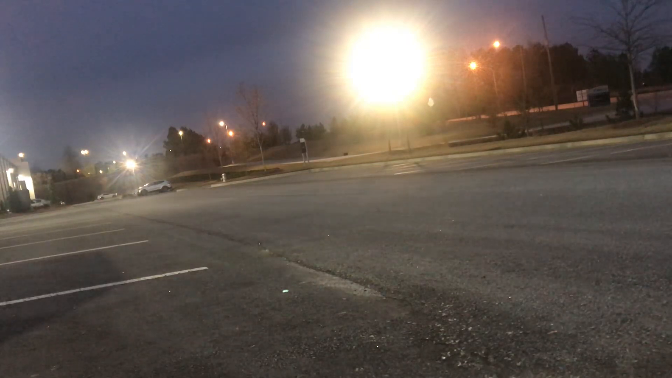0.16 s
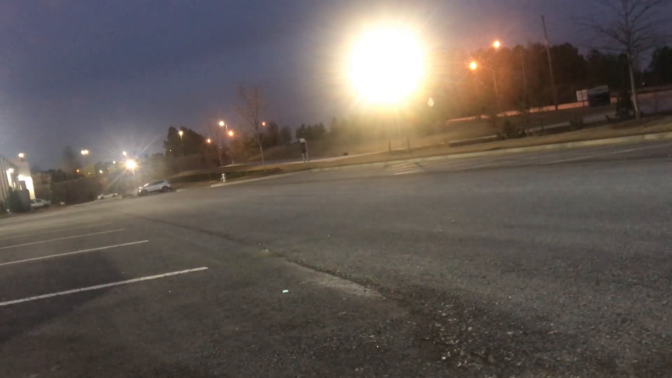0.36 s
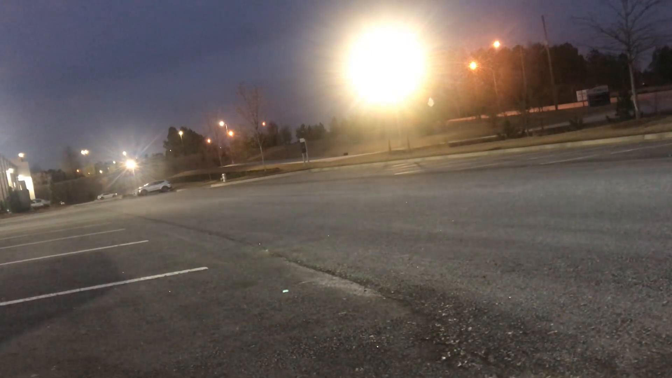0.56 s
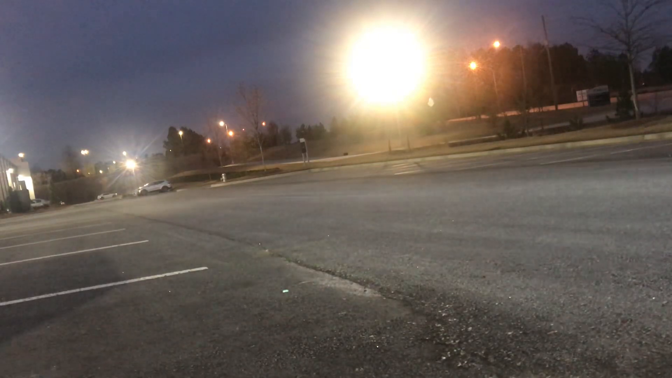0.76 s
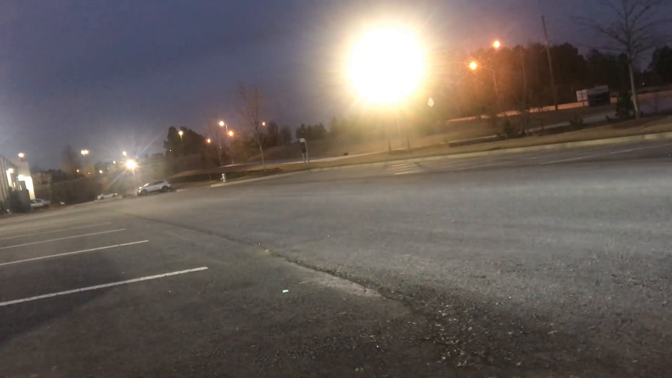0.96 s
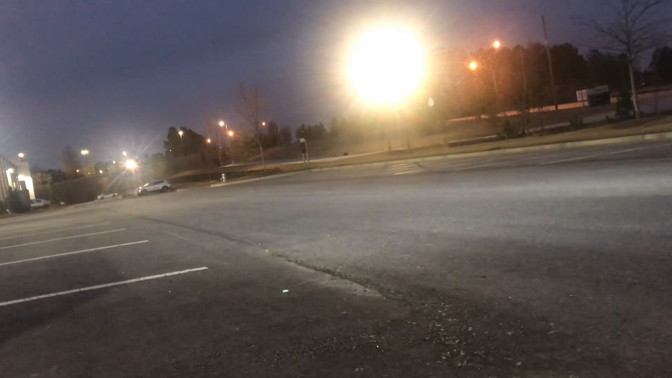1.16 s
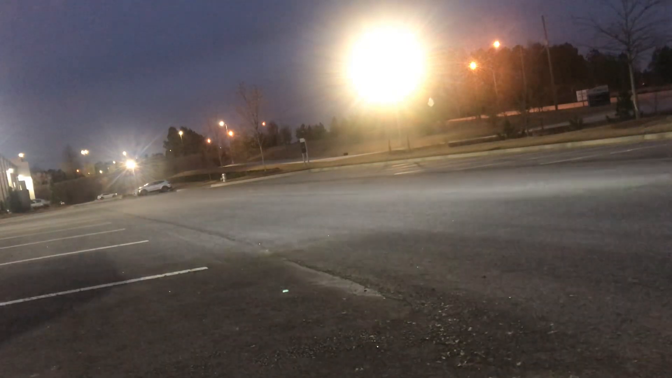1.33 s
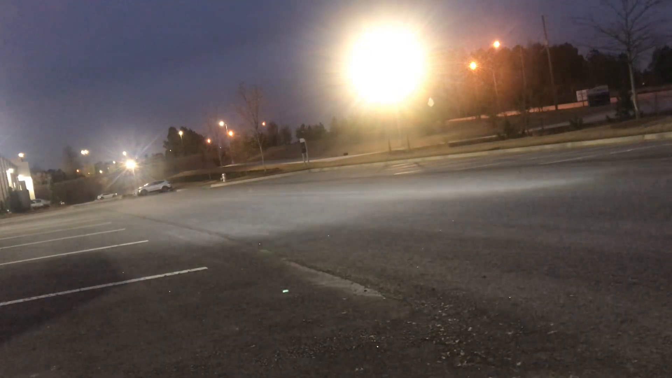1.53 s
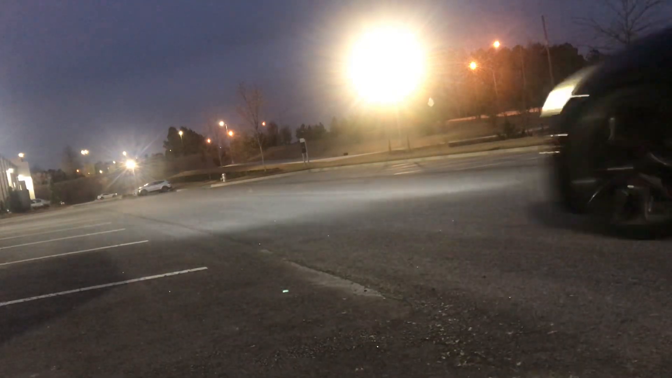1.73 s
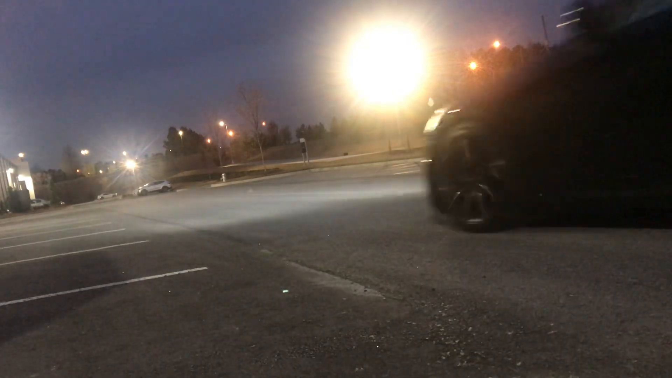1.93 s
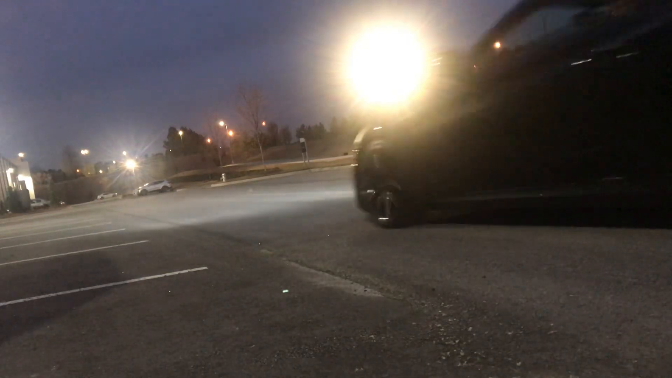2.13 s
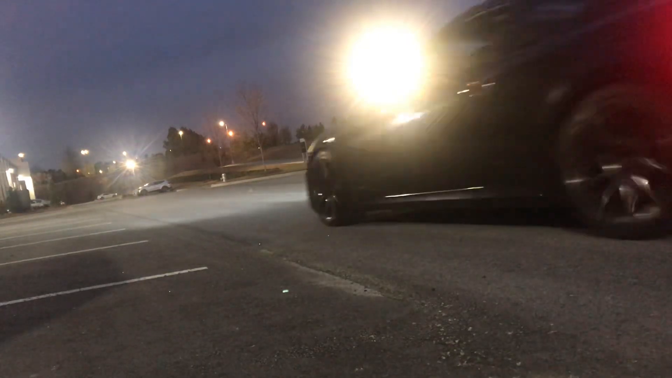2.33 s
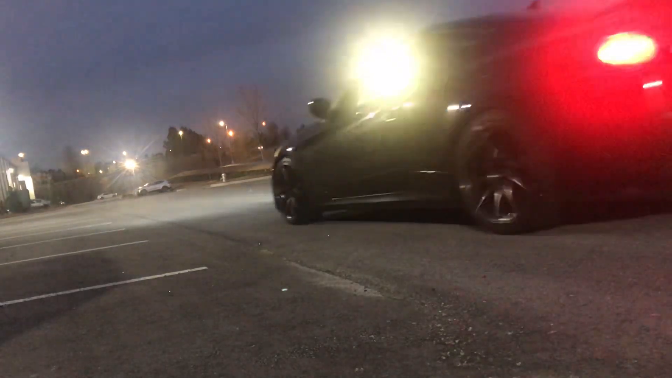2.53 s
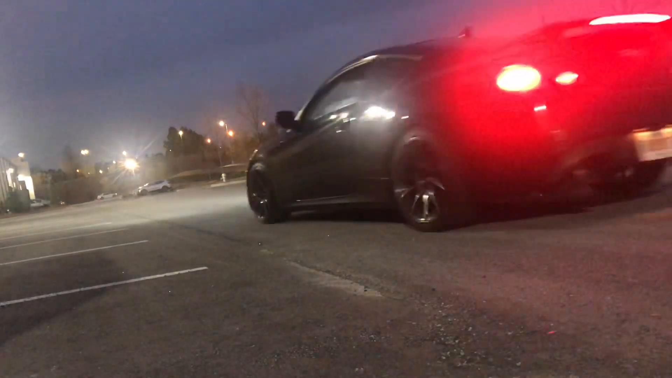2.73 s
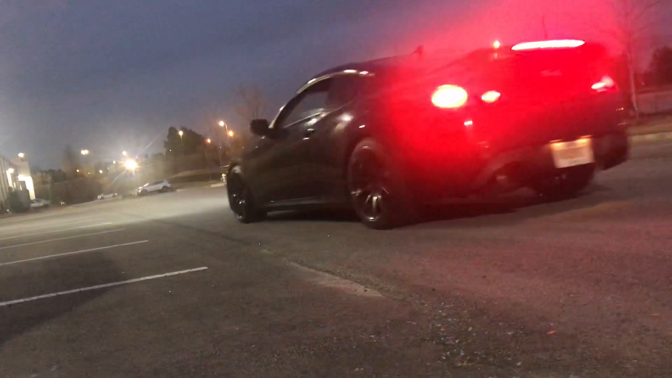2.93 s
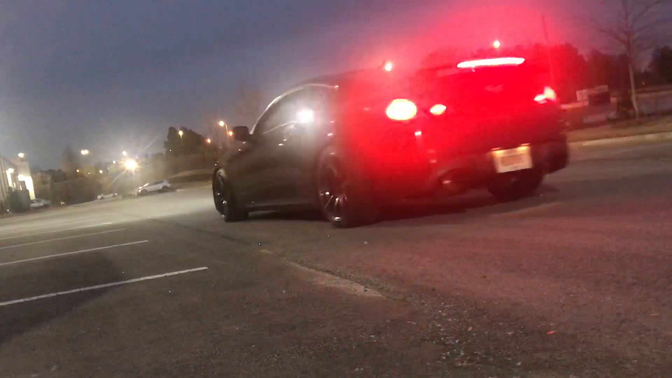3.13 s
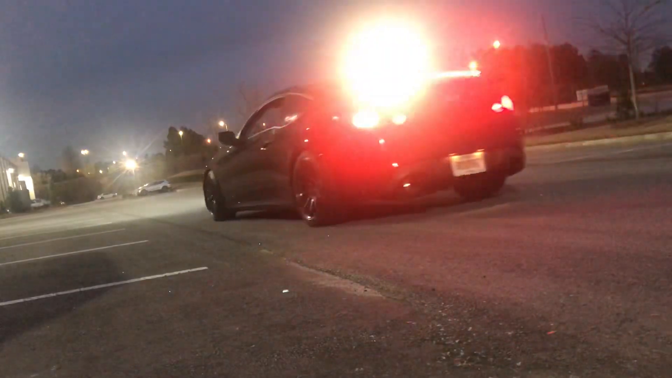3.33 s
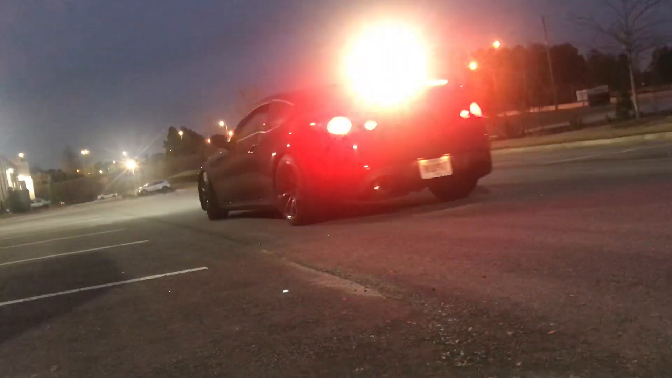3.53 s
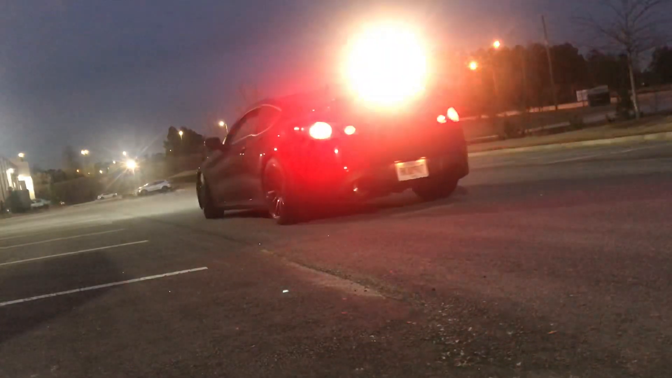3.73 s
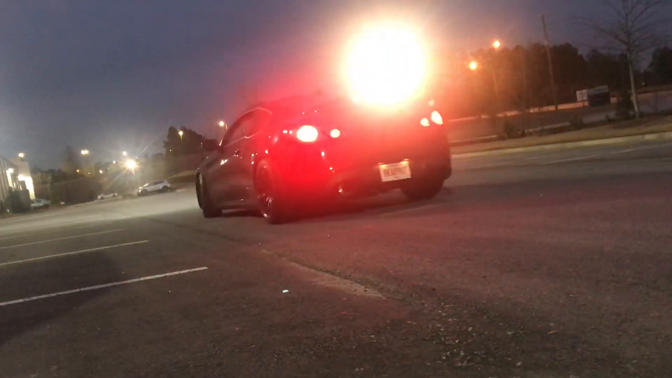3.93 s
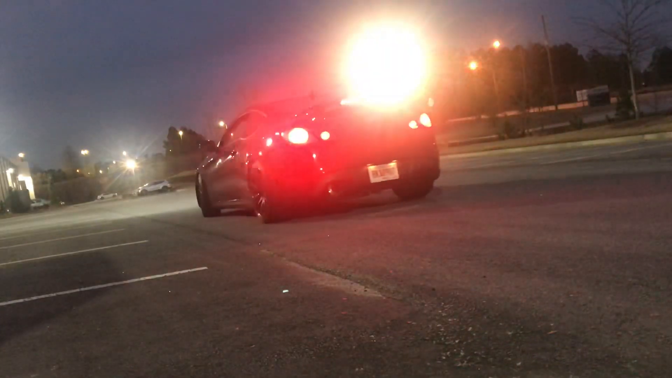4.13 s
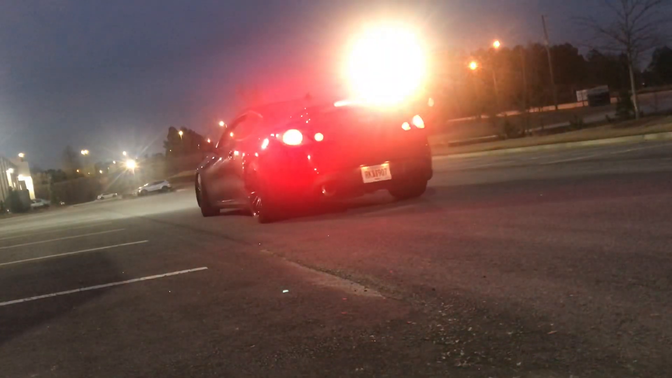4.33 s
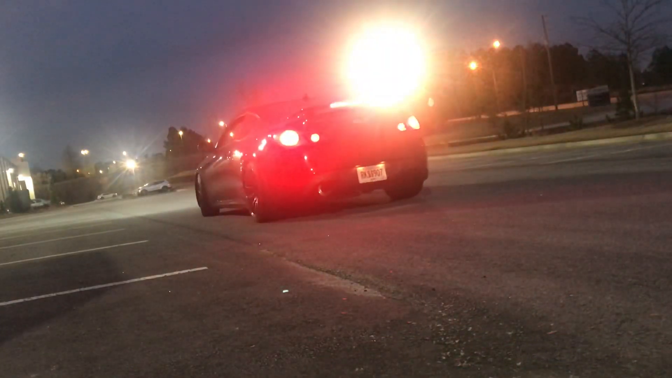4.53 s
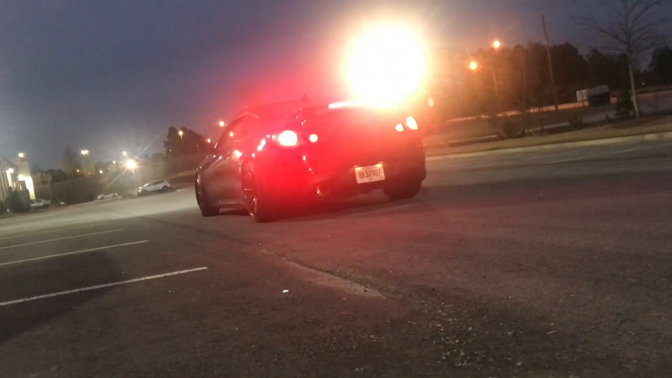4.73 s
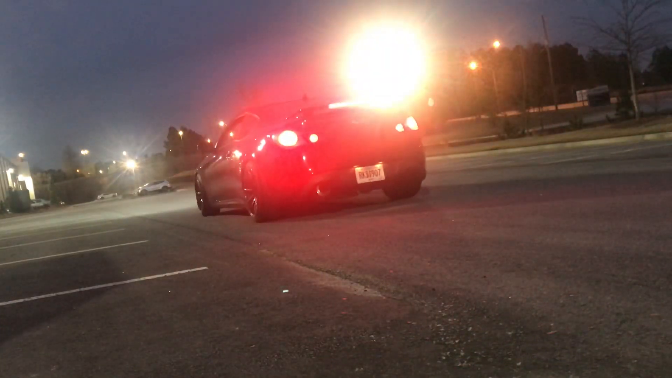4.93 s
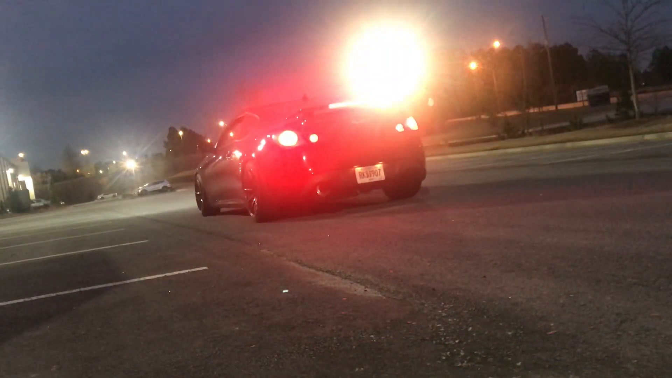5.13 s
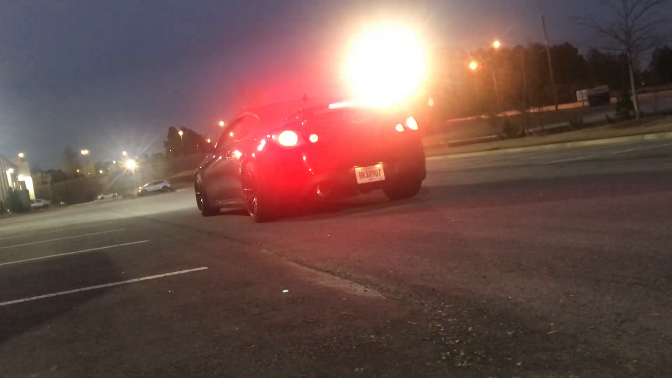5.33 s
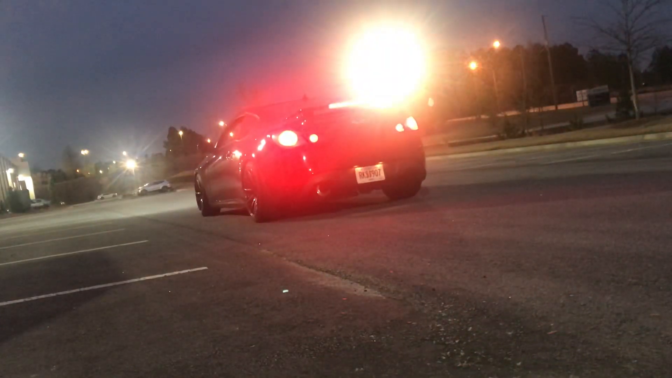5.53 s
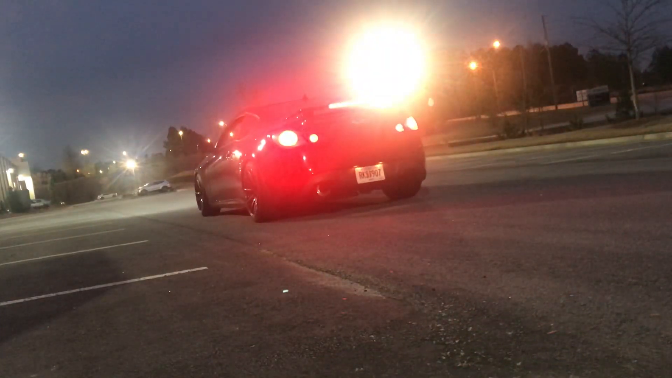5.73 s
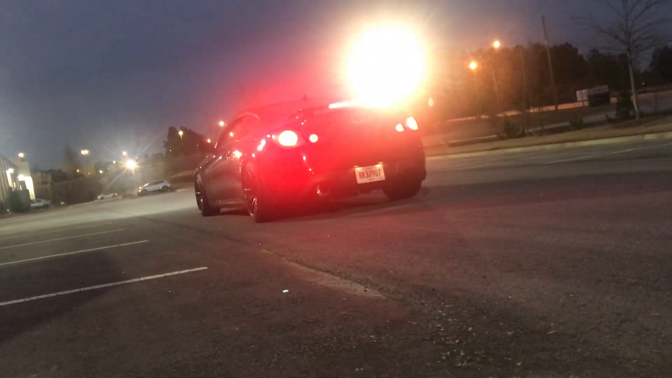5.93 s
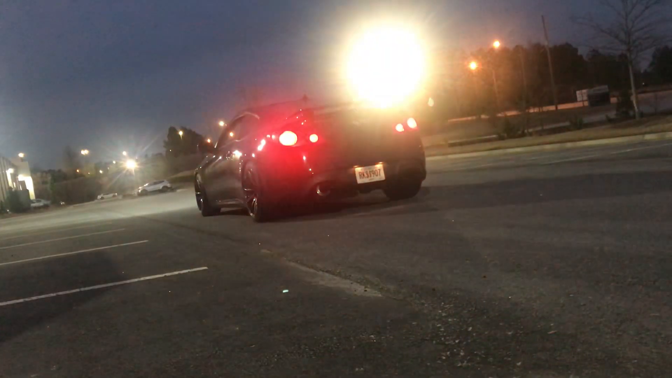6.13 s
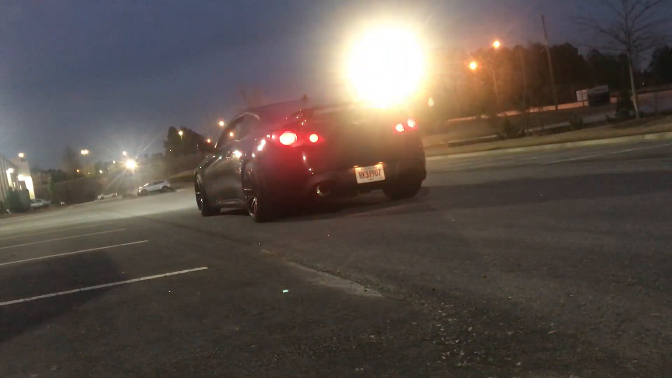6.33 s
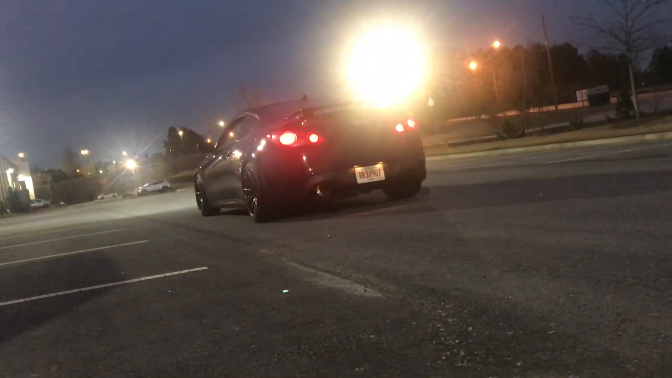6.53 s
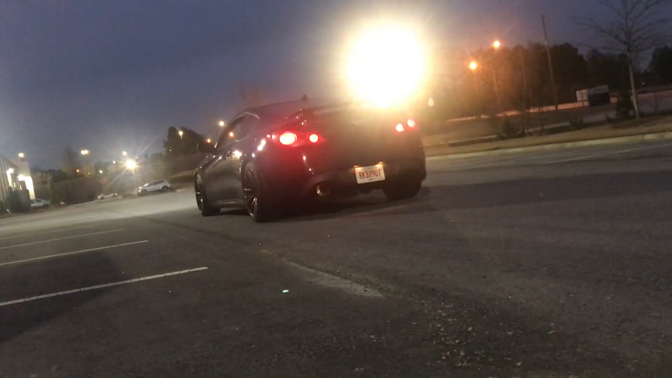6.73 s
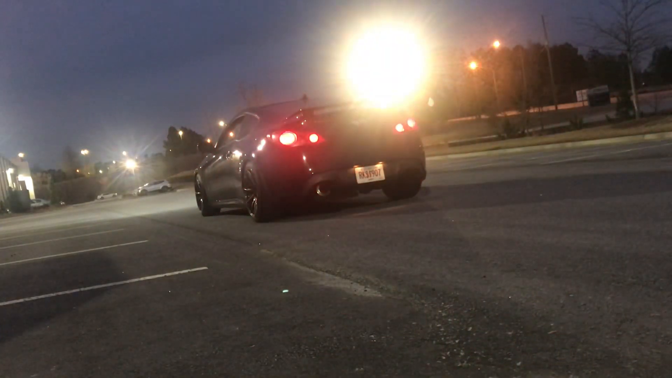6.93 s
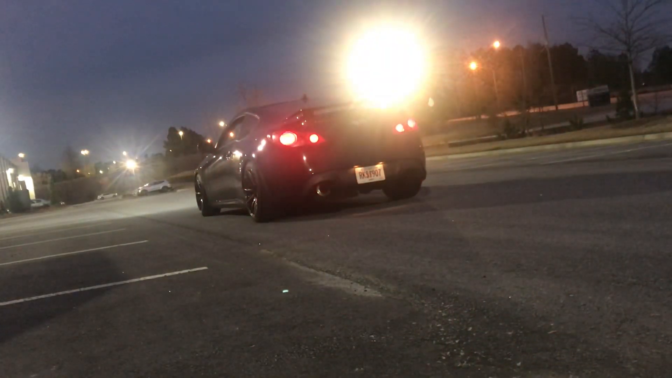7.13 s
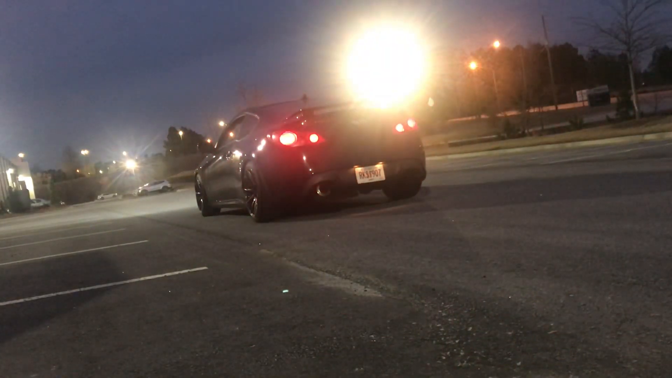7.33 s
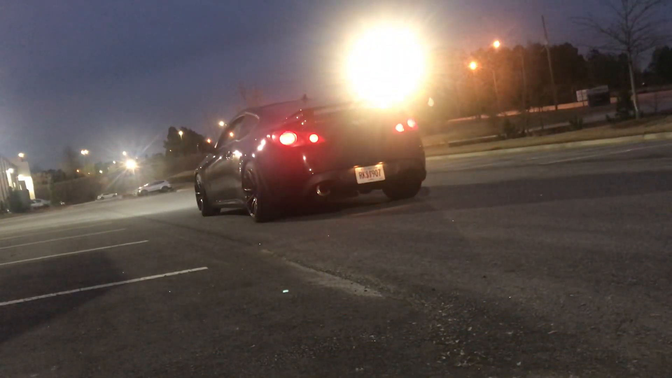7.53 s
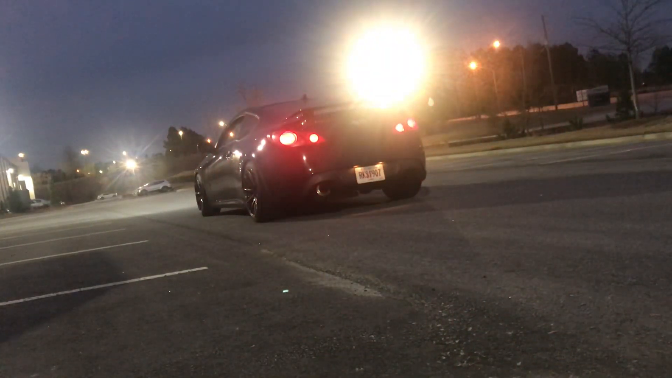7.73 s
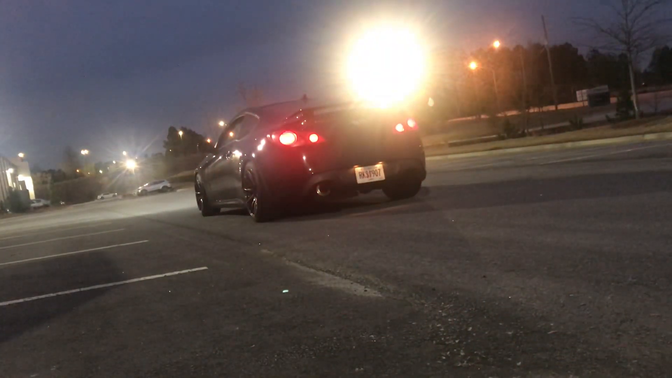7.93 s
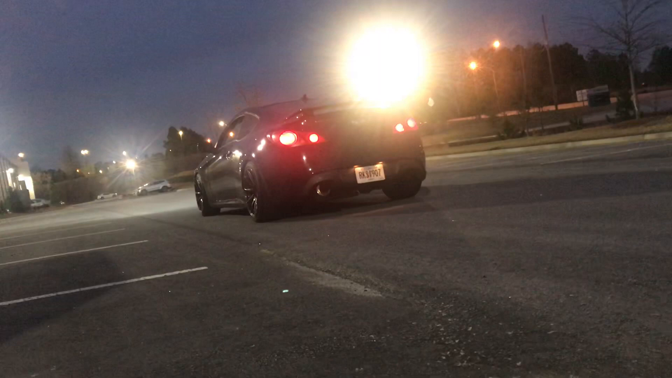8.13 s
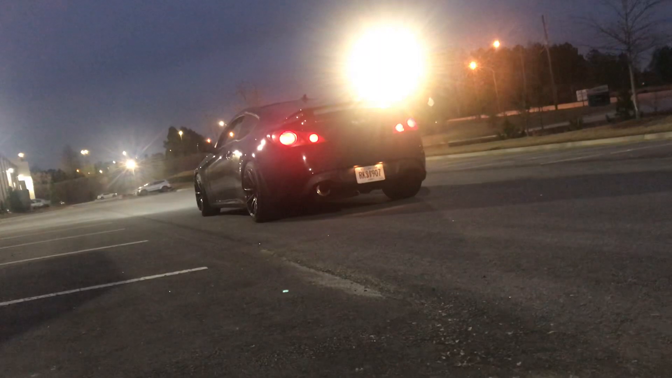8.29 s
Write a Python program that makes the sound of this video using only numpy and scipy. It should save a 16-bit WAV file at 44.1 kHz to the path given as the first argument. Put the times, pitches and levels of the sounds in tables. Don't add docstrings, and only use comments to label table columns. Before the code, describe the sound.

A four-cylinder car coasts toward a microphone near the ground, droning lower as it slows, with swelling tyre hiss and faint metallic squeals. A deep exhaust boom passes very close, followed by a clutch clank. It then idles unevenly, surging and sagging, with a loose shield knocking and small scuffs. Two hard revs finish it: a raspy bark, then a sharper, higher one with violent crackles, answered by the lot.

```python
import sys
import numpy as np
from scipy import signal
from scipy.fft import rfft, irfft, next_fast_len
from scipy.io import wavfile
from scipy.ndimage import uniform_filter1d, map_coordinates

SR = 44100
rng = np.random.default_rng(int(sys.argv[2]) if len(sys.argv) > 2 else 0)


def unload_audio(sound):
    columns = np.transpose(np.atleast_2d(sound))
    steps = np.round(np.clip(columns, -1, 1) * 32767)
    wavfile.write(sys.argv[1], SR, steps.astype(np.int16))


def gain_from_decibels(decibels):
    exponent = np.asarray(decibels, float) / 20
    return 10 ** exponent


N = 368676
T = np.arange(N) / SR

# time_s, firing_rate_hz
COAST_SPEED = [(0, 77.06), (.3, 75.11), (1.04, 65.71), (1.8, 51.74), (2.35, 37.04)]
# time_s, firing_rate_hz
IDLE_SPEED = [(2.6, 35.66), (3.25, 30.79), (3.64, 30.21), (3.95, 31.13), (4.2, 29.29), (4.45, 28.67),
              (4.85, 25.39), (5.6, 24.64), (6.6, 24.35)]
# time_s, firing_rate_hz
BLIP_SPEED = [
    [(6.7, 29.76), (6.76, 39.8), (6.9, 54.75), (7.1, 89.21), (7.17, 96.58), (7.32, 96.71), (7.5, 93.62),
     (7.76, 84.08)],
    [(7.81, 86.65), (8, 118.22), (8.15, 147.66), (8.19, 148.3), (8.36, 146.07)],
]
# time_s, level_db, pulse_sharpness_db
COAST_LOAD = [(0, -23, -3), (.1, -21.5, 3.5), (.3, -20, -1.5), (.4, -16, 0.5), (.9, -18.5, 2),
              (1.5, -14.5, -2.5), (1.95, -11.5, 0.5), (2.2, -10, 6), (2.3, -12.5, 6)]
# time_s, level_db, sag_db_per_s, pulse_sharpness_db
IDLE_CATCHES = [(2.341, -14.5, 1.5, 1.5), (2.88, -15, 20, 1.5), (3.181, -22.5, 27, 1),
                (3.335, -16.5, 10, 2), (3.93, -15, 28, 1.5), (4.2, -18, 21, 1.5), (4.54, -19, 51, 1.5),
                (4.669, -26.5, -2, -1.5), (4.81, -20, 4, 0), (5.3, -19, 16.5, -0.5), (5.8, -29.5, -0.5, -2)]
# time_s, level_db, pulse_sharpness_db
BLIP_LOAD = [
    [(6.62, -16.5, -3), (6.74, -14, -4.5), (6.82, -8.5, -2.5), (6.92, -10.5, -1.5), (7.06, -7, 2.5),
     (7.17, -8.5, 0), (7.29, -20.5, -1), (7.42, -14.5, -5.5), (7.75, -18, -4.5)],
    [(7.81, -13, 4.5), (7.87, -9, -0.5), (7.95, -13.5, 2.5), (8.03, -10, 7), (8.12, -21.5, 6.5),
     (8.22, -1, -6), (8.28, -24.5, 20), (8.36, -7, -7)],
]
# opens_s, shuts_s, full_bark_db, rasp_over_bark_db
THROTTLE = [
    (6.619, 7.156, -22.5, -27),
    (7.802, 8.249, -23, -22),
]
FIRST_BLIP_S = THROTTLE[0][0]
# start_s, end_s, misfire_0_to_1
MISFIRES = [
    (.12, .35, .4),
    (2.3, 2.36, .3),
    (7.2, 7.4, .27),
    (7.76, 7.81, .4),
    (8.2, 8.4, .45),
]
CYLINDERS = [.7, -.5, .3, -.5]
# centre_hz, width_hz, level_db
PIPE_MODES = [(81.1, 28.2, 9.5), (165.7, 76.4, 8), (304, 67.5, -0.5), (361.7, 32.3, -14.5)]
# delay_s, gain
ROUND_TRIPS = [(.0058, .3), (.0107, .4), (.0172, .26), (.0225, .14), (.0305, .25)]
# centre_hz, width_hz, level_db
BARK_MODES = [(390, 180, 0), (600, 220, -.5), (820, 200, .5), (1150, 400, -5), (1620, 350, -5)]
# centre_hz, width_hz, level_db
RASP_MODES = [(2333, 88, 1), (3260, 710, -18), (3640, 43, -6.5), (4530, 420, -11.5), (6460, 920, -12),
              (9700, 2200, -30)]
# time_s, peak_db, snap_db, thud_db
POPS = [(2.156, -23.5, -37, -7), (2.309, -27.5, -38, 15), (7.167, -8, -27.5, 1), (7.212, -12, -16.5, 10),
        (7.362, -33.5, -26, 13), (7.819, -23.5, -28.5, -31), (7.861, -11, -32.5, 1),
        (7.898, -8.5, -35.5, -16), (7.917, -15.5, -20.5, -12), (7.939, -6, -32, -21), (8.212, 3, -5, -5),
        (8.233, -7, -31, -5), (8.255, -12, -23, 3), (8.283, -2.5, -16.5, 1), (8.303, -5, -12, 2),
        (8.356, -15, -28, -29)]
# time_s, level_db
NEARNESS = [(0, -21.5), (.51, -17), (1.05, -9.5), (1.56, -1), (1.71, -1), (2.41, -10), (3.2, -13.5),
            (4.3, -17.5), (6.6, -17.5)]
# pitch_hz, level_db_per_hz
TYRES = [(210, -1.5), (350, 4), (438, -12.5), (663, -11), (984, -13), (1080, -12), (1200, -11.5),
         (1440, -20.5), (3000, -35.5), (3900, -45), (6600, -120)]
# pitch_hz, level_db_per_hz
ENGINE_BAY = [(1180, -39), (2000, -10), (2290, -9.5), (2460, -8), (4250, -13), (5030, -20), (5650, -17),
              (6060, -28.5), (6640, -22), (7250, -31), (8000, -31), (10400, -65.5), (17600, -120)]
# pitch_hz, level_db_per_hz
AIR = [(3530, -39), (6000, -4.5), (7770, -10.5), (9310, -8), (10400, -14.5), (12100, -9.5), (15100, -14),
       (16000, -35)]
# start_s, end_s, first_pitch_hz, last_pitch_hz, level_db
SQUEALS = [(-.2, 0.266, 1110, 1018, -45), (0.435, 1.492, 1029, 900, -39), (0.517, 1.29, 1296, 1330, -46.5),
           (1.102, 1.802, 1330, 1072, -41.5), (2.305, 2.335, 1238, 1140, -35.5),
           (2.507, 3.157, 3665, 3690, -58.5), (3.269, 3.985, 2960, 2815, -65.5),
           (3.7, 4.059, 5780, 5660, -67.5), (3.77, 4.812, 2380, 2264, -63), (4.602, 5.399, 2267, 2180, -58),
           (4.603, 5.278, 6960, 6500, -76), (6.545, 6.612, 3380, 3300, -61.5)]
# start_s, length_s, level_db
SCUFFS = [(0, 0.02, -51.5), (2.19, 0.0095, -66), (2.267, 0.017, -49.5), (3.334, 0.0024, -46.5),
          (3.535, 0.012, -56), (4.948, 0.022, -56.5), (5.309, .15, -46.5), (5.495, 0.024, -64.5),
          (5.84, 0.11, -66.5), (6.171, 0.044, -49), (6.556, 0.088, -66), (7.13, 0.09, -49),
          (8.144, 0.22, -40.5), (8.217, 0.027, -36)]
# pitch_hz, level_db_per_hz
SCUFF_SPECTRUM = [(880, -49), (1500, -3), (1980, -7), (2710, -8), (3300, -5), (4430, -12.5), (4890, -17),
                  (5240, -15.5), (7330, -14.5), (10400, -21), (12000, -19), (14300, -20), (15800, -13)]
# pitch_hz, t60_s
LOT_DECAY = [(100, 0.33), (1000, 1), (8000, 0.041)]


def exhaust(pulses, cracks):
    return pipe_tone(pulses), open_bark(cracks)


def pipe_tone(pulses):
    level_db, sharp_db = load()
    lingering = pulses * np.minimum(1, (34 / speed()) ** 2)
    waves = pulses + sum(gain * np.roll(lingering, round(s * SR)) for s, gain in ROUND_TRIPS)
    swell = unit(pipe(waves, PIPE_MODES, top_hz=460))
    swell = swell + .12 * unit(pipe(gated(pulses, decay=.03), PIPE_MODES, top_hz=480))
    boom, low, mid = below(swell, hz=125), below(swell, hz=245), below(swell, hz=325)

    pass_s, pass_width_s, pass_db = 2.216, .16, 24.5
    boom_db = -3 - 1.96 * sharp_db + pass_db * np.exp(-((T - pass_s) / pass_width_s) ** 2)
    fade_db_per_octave = 32
    boom_db = boom_db - fade_db_per_octave * np.clip(np.log2(speed() / 105), 0, None)

    weak_db, loss_per_db = -25, 12
    honk_db = .5 + 1.5 * sharp_db + loss_per_db * np.minimum(level_db - weak_db, 0)
    cold = T < FIRST_BLIP_S
    honk_top_db = np.where(cold, -4, 8)
    honk = mid - low + gain_from_decibels(honk_top_db) * (swell - mid)
    deep = .92 * cold * below(swell, hz=80)
    tone = gain_from_decibels(boom_db) * (boom + deep) + low - boom + gain_from_decibels(honk_db) * honk
    return gain_from_decibels(level_db) * steady(tone)


def open_bark(cracks):
    bark_db, edge_db, rasp_db = throttle()
    cracks = np.roll(cracks, round(-.003 * SR))
    front = 2.1 * unit(cracks) + unit(gated(cracks, decay=.005)) + .25 * rng.standard_normal(N)
    bark = pipe(front, BARK_MODES, top_hz=2000)
    bark = below(bark, hz=1900)
    dull = below(bark, hz=1250)
    fizz = unit(gated(cracks, decay=.0045)) + .3 * rng.standard_normal(N)
    rasp = pipe(fizz, RASP_MODES, top_hz=16200)
    voice = steady(dull) + gain_from_decibels(edge_db) * steady(bark - dull) + gain_from_decibels(rasp_db) * steady(rasp)
    return gain_from_decibels(bark_db) * voice


def firings():
    phase = np.cumsum(speed()) / SR
    phase += 400 - phase[round(4.841 * SR)]
    count = np.arange(np.ceil(phase[0]), phase[-1] - 1).astype(int)
    when = np.interp(count, phase, T)
    misfire = np.where(when < IDLE_CATCHES[0][0], .04, .07)
    misfire = misfire + sum(depth * (when > start) * (when < end) for start, end, depth in MISFIRES)
    chance = rng.standard_normal((len(count), 3))
    when = when + misfire * .12 * chance[:, 0] * np.gradient(when)
    at = np.clip(np.round(when * SR).astype(int), 0, N - 1)
    size_db = np.take(CYLINDERS, count % 4) + (.4 + 6 * misfire) * chance[:, 1]
    crack_db = .6 * size_db + 1.8 * chance[:, 2]
    return phase, np.bincount(at, gain_from_decibels(size_db), N), np.bincount(at, gain_from_decibels(crack_db), N)


def speed():
    return curves(COAST_SPEED + IDLE_SPEED + sum(BLIP_SPEED, []))[0]


def load():
    s, db, sag, sharp = np.transpose(IDLE_CATCHES)
    k = np.clip(np.searchsorted(s, T) - 1, 0, None)
    governor_s = .05
    idle = uniform_filter1d([db[k] - sag[k] * (T - s[k]), sharp[k]], int(governor_s * SR), axis=1)
    running = np.where(T < FIRST_BLIP_S, idle, curves(sum(BLIP_LOAD, [])))
    stages = np.where(T < s[0], curves(COAST_LOAD), running)
    return uniform_filter1d(stages, size=400, axis=1)


def throttle():
    opens, shuts, full_db, rasp_db = np.transpose(THROTTLE)
    k = np.clip(np.searchsorted(opens, T) - 1, 0, None)
    open_s, shut_s = .039, .085
    since = np.clip(T - opens[k], 0, None)
    shut = np.clip((T - shuts[k]) / shut_s, 0, 1)

    bark_db = full_db[k] + 5.5 * np.log2(np.minimum(speed() / 65.3, 1)) - 6 * np.exp(-since / open_s)
    bark_db = bark_db - shut * (9 + 9 * (T - shuts[k])) - 90 * (T < opens[0])
    edge_db = (1 - shut) * (-7 - 10 * since) + shut * -36

    buzz_hz, buzz_octaves, buzz_db = 40.5, 1, 13
    buzz_db = buzz_db * np.exp(-(np.log2(speed() / buzz_hz) / buzz_octaves) ** 2)
    return bark_db, edge_db, (1 - shut) * (rasp_db[k] + buzz_db) + shut * -21


def pops():
    s, peak_db, snap_db, thud_db = np.transpose(POPS)

    def kick(db):
        return np.bincount(np.round(s * SR).astype(int), gain_from_decibels(db), N)[:N]

    def bright(f):
        return (1j * f / (3500 + 1j * f)) ** 2 / (1 + 1j * f / 12000)

    bark = pipe(kick(peak_db + 26.5) + gated(kick(peak_db), decay=.0084), BARK_MODES, top_hz=3600)
    snap = filtered(gated(kick(peak_db + snap_db + 3), decay=.0007), bright)
    thud = pipe(kick(peak_db + thud_db + 34), PIPE_MODES, top_hz=500)
    return bark + snap + thud


def rolling():
    near_db, = curves(NEARNESS)
    brake_s, stop_s, hush_db = 2, 3.07, 11.5
    gust = .85 * wobble(11)
    tyres_db = -29 + .33 * near_db - hush_db * ramp(brake_s, stop_s) + gust + wobble(27)
    bay_db = -45 + near_db + .37 * gust + .66 * wobble(40)
    air_db = -51 + 1.26 * near_db + 10 * (T > FIRST_BLIP_S) + wobble(17)
    return gain_from_decibels(tyres_db) * hiss(TYRES) + gain_from_decibels(bay_db) * hiss(ENGINE_BAY) + gain_from_decibels(air_db) * hiss(AIR)


def squeals():
    out = np.zeros(N)
    for start, end, hz0, hz1, db in SQUEALS:
        u = np.clip((T - start) / (end - start), 0, 1)
        tone = np.sin(2 * np.pi * np.cumsum(hz0 + (hz1 - hz0) * u) / SR)
        fade = np.sqrt(np.sin(np.pi * u) + 1e-12) * (u > 0) * (u < 1)
        flutter = .6 + wobble(.05 * hz0 + 6 / (end - start))
        out += gain_from_decibels(db) * fade * tone * flutter
    return out


def rattles(phase):
    knock_from_s = 2.33
    knock_db = load()[0] - 25.5 - 2.5 * (T - knock_from_s)
    knock_db = np.where((T > knock_from_s) & (T < FIRST_BLIP_S), knock_db, -70)
    tick_db = -60 + 8 * ramp(5.95, 6.2)
    once = np.exp(.55 * np.cos(2 * np.pi * (phase / 4 - .1))) * rng.standard_normal(N)
    twice = np.exp(.6 * np.cos(4 * np.pi * phase) + .27 * wobble(5)) * rng.standard_normal(N)
    knock = unit(pipe(once, [(561, 120, 0)], top_hz=900))
    tick = unit(pipe(twice, [(1620, 89, 0)], top_hz=2400))
    return gain_from_decibels(knock_db) * knock + gain_from_decibels(tick_db) * tick


def scuffs():
    shape = sum(gain_from_decibels(db - 5 * ((T - s) / length) ** 4) * (T > s) for s, length, db in SCUFFS)
    return shape * gain_from_decibels(1.5 * wobble(70)) * hiss(SCUFF_SPECTRUM)


def lot(x):
    hz, t, z = signal.stft(rng.standard_normal(SR // 2), SR, nperseg=256)
    tail = signal.istft(z * gain_from_decibels(-60 * t / along(LOT_DECAY, hz)[:, None]), SR, nperseg=256)[1]
    return signal.fftconvolve(np.pad(x, (900, 0)), tail / np.linalg.norm(tail))[:N]


def pipe(x, modes, top_hz):
    def ring(f):
        total = 0
        for k, (centre, width, db) in enumerate(modes):
            damping = 1j * f * width
            total = total + (-1) ** k * gain_from_decibels(db) * damping / (centre * centre - f * f + damping)
        return total

    return filtered(x, lambda f: ring(f) / (1 - (f / top_hz) ** 2 + 1.4j * f / top_hz) ** 2)


def gated(pulses, decay):
    burst = signal.lfilter([1], [1, -np.exp(-1 / (decay * SR))], pulses)
    return burst * rng.standard_normal(N)


def hiss(spectrum):
    return unit(filtered(rng.standard_normal(N), lambda f: gain_from_decibels(along(spectrum, f))))


def below(x, hz):
    return filtered(x, lambda f: 1 / (1 + (f / hz) ** 8))


def filtered(x, response):
    m = next_fast_len(N + SR // 2)
    return irfft(rfft(x, m) * response(np.fft.rfftfreq(m, 1 / SR)), m)[:N]


def unit(x):
    return x / np.sqrt(np.mean(x ** 2) + 1e-20)


def steady(x, span=.11):
    n = int(span * SR)
    power = uniform_filter1d(uniform_filter1d(x * x, n), n)
    return x / np.sqrt(np.abs(power) + 1e-12)


def curves(rows):
    s, *cols = np.transpose(rows)
    return [np.interp(T, s, c) for c in cols]


def along(points, hz):
    f, v = np.transpose(points)
    return np.interp(np.log(hz + 1), np.log(f + 1), v)


def wobble(rate):
    return map_coordinates(rng.standard_normal(int(N * rate / SR) + 4), [T * rate])


def ramp(start, end):
    return np.clip((T - start) / (end - start), 0, 1)


def scene():
    phase, pulses, cracks = firings()
    tone, bark = exhaust(pulses, cracks)
    bangs = bark + pops()
    echo = gain_from_decibels(-14) * lot(bangs)
    car = rolling() + squeals() + rattles(phase) + scuffs()
    return (tone + bangs + echo + car)[None]


def roll_off(x):
    return signal.sosfilt(signal.butter(12, 16670, fs=SR, output="sos"), x)


def record(dry):
    bass_cut_hz, top_hz, ceiling = 48, 15830, .99
    heard = filtered(dry[0], lambda f: (f < top_hz) / (1 + (bass_cut_hz / (f + 1)) ** 4))[None]
    held = heard / (1 + np.abs(heard / ceiling) ** 6) ** (1 / 6)
    return roll_off(held)


dry = scene()
out = record(dry)
unload_audio(out)
```